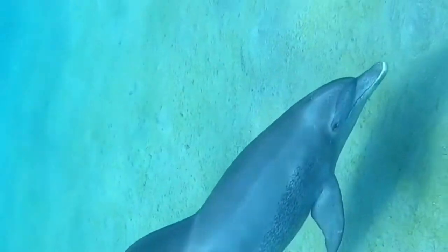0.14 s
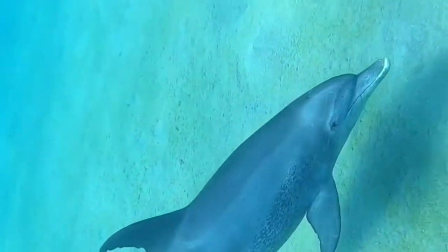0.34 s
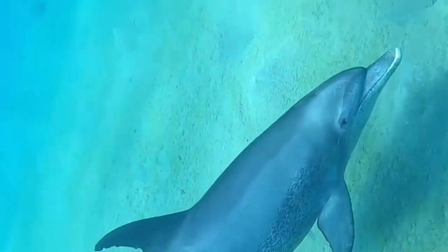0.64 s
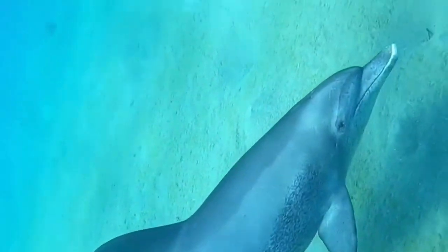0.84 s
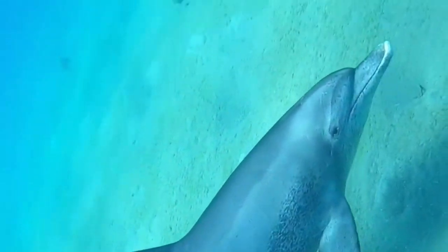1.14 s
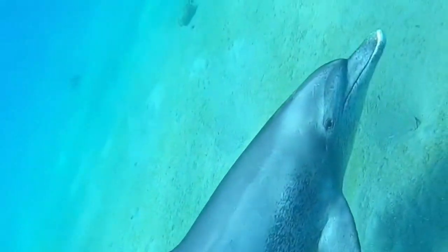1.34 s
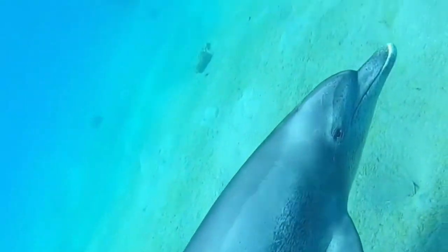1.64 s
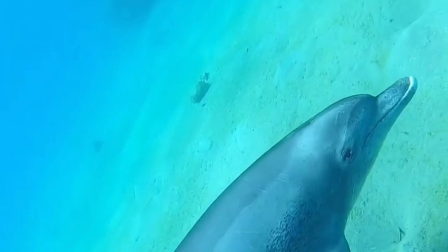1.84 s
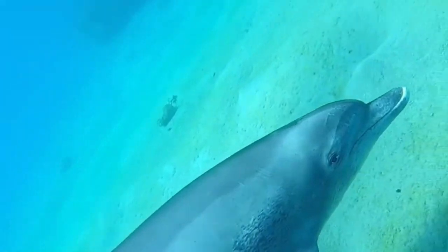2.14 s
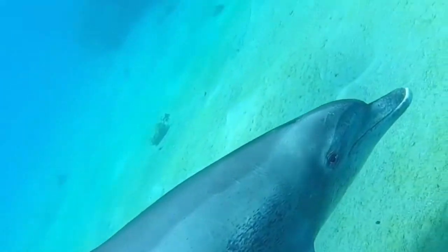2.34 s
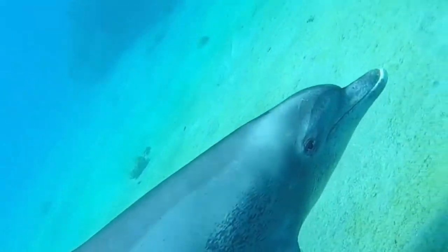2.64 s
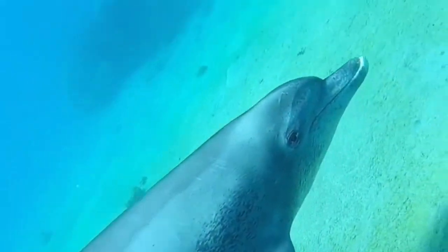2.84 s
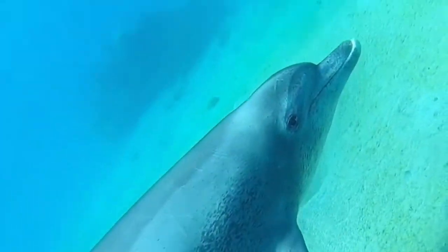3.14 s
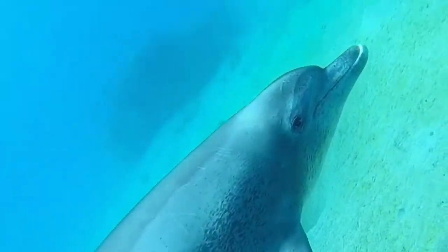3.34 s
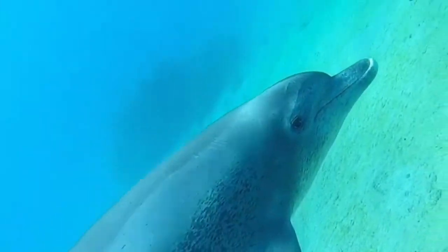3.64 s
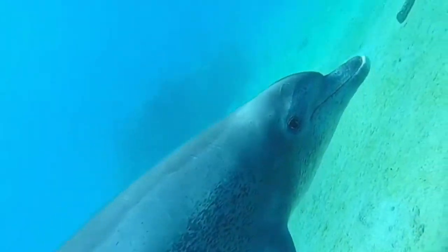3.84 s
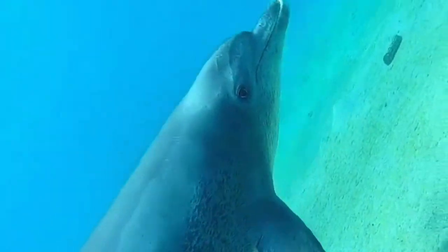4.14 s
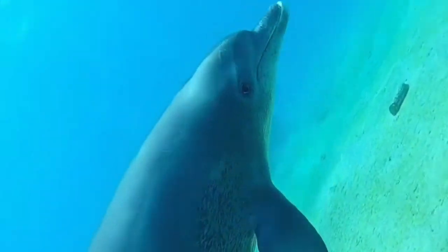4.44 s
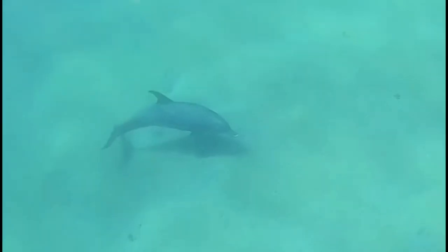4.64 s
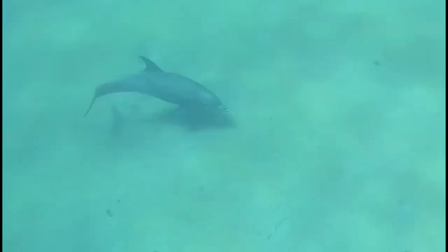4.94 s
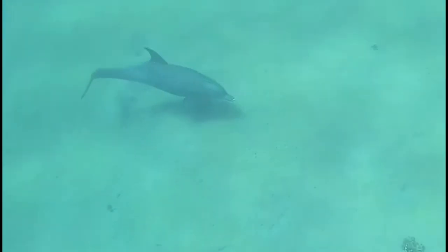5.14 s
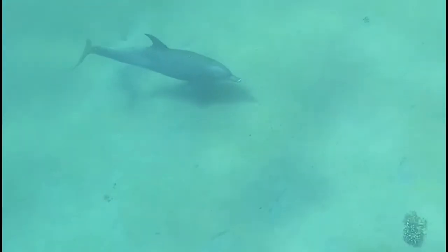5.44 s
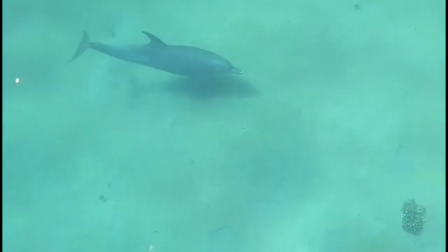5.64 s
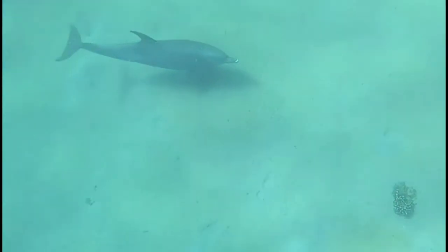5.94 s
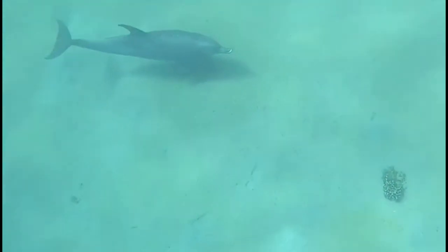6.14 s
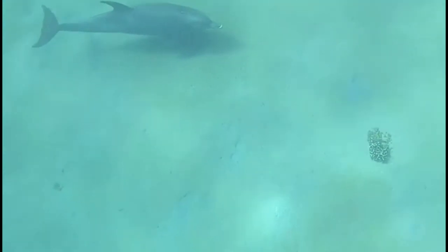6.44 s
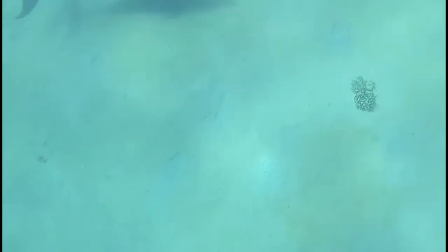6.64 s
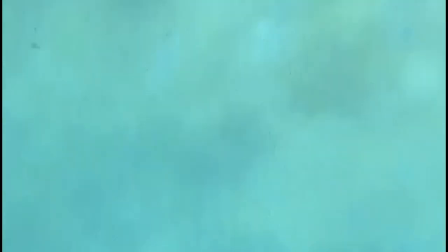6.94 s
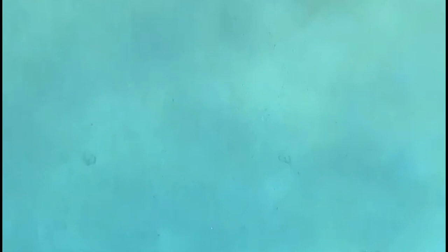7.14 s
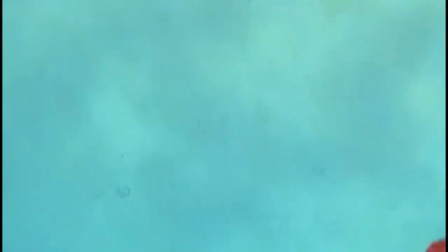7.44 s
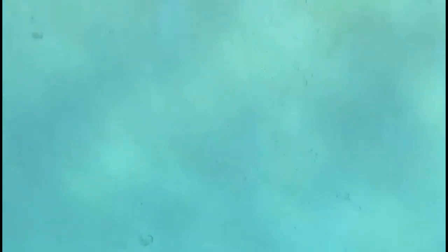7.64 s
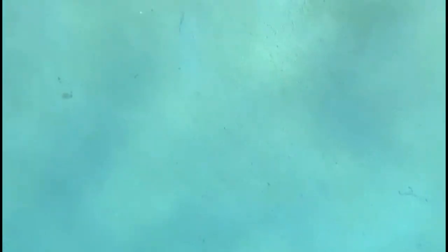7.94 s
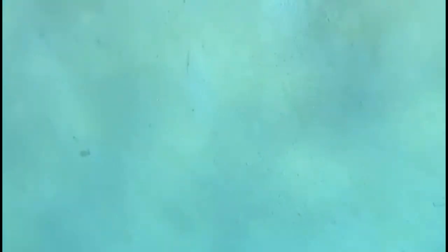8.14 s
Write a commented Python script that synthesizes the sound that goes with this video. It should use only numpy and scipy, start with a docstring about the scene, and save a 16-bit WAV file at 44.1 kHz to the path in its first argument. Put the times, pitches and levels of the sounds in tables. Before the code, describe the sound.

Muffled rumbling water and a distant motor drone, an abrupt change, four echoing upward dolphin whistles, and a sudden bubbly splash that dies away.

```python
"""Under water over a sandy bottom, heard from a sealed housing: noisy, rumbling water, a distant engine's hum, bubbles.
After an abrupt change of place a dolphin's whistle is cut into near its end, then a rising whistle comes four times.
Each whistle is a gliding tone with delayed copies, as if mirrored by the surface and the seabed.
Then churned water, air slaps and gushes of froth, made of filtered noise and falling pulses, rush up and die away."""
import sys
import numpy as np
from scipy import signal
from scipy.fft import rfft, irfft
from scipy.io import wavfile
from scipy.ndimage import uniform_filter1d

SR = 44100
rng = np.random.default_rng(int(sys.argv[2]) if len(sys.argv) > 2 else 0)


def int16_out(signal):
    """Quantize to a 16-bit WAV file."""
    q = np.round(np.clip(np.atleast_2d(signal).T, -1, 1) * 32767)
    wavfile.write(sys.argv[1], SR, q.astype(np.int16))


N = 365588
TIME = np.arange(N) / SR
FREQ = np.maximum(np.arange(N // 2 + 1) * SR / N, 1)
TOP_HZ = 15600  # upper limit of the sound
CUT_S, RESUME_S = 4.597, 4.611  # the first place stops, the second is let in
CHURN_START_S, CHURN_RISE_S = 7.08, 0.064  # when the rush begins and how long it takes to rise


def undb(db):
    """Decibels to gain."""
    return 10 ** (np.asarray(db) / 20)


def curve(table, column=1):
    """One column of a table, joined by straight lines in time."""
    rows = np.asarray(table)
    return np.interp(TIME, rows[:, 0], rows[:, column])


def ramp(start_s, end_s):
    """Rises evenly from 0 to 1 between two times."""
    return np.clip((TIME - start_s) / max(end_s - start_s, 1 / SR), 0, 1)


def gate(start_s, end_s):
    """On between two times, with soft edges."""
    return uniform_filter1d(1. * ((TIME > start_s) & (TIME < end_s)), 200)


def unit(x):
    """Scale to rms 1."""
    return x / np.sqrt(np.mean(x ** 2))


def colour(x, points, resonances=()):
    """Filter by a smooth spectrum with bell-shaped lifts or dips on it."""
    hz, db = np.transpose(points)
    shape = np.interp(np.log(FREQ), np.log(hz), db)
    for centre, width, lift in resonances:
        shape = shape + lift * np.exp(-2 * ((FREQ - centre) / width) ** 2)
    return irfft(rfft(x) * undb(shape), N)


def band(x, low_hz, high_hz):
    """The part of a sound between two frequencies."""
    return irfft(rfft(x) * ((FREQ >= low_hz) & (FREQ < high_hz)), N)


def filtered(x, order, edges_hz, kind="low"):
    """Pass a sound through a filter with gentle edges."""
    return signal.sosfilt(signal.butter(order, edges_hz, kind, fs=SR, output="sos"), x)


def delay(x, ms):
    """Delay by any fraction of a sample."""
    return irfft(rfft(x) * np.exp(-2j * np.pi * FREQ * ms / 1000), N)


def walk(rate):
    """Random wandering of rms 1: chance levels held for 1 / rate seconds and smoothed twice."""
    k = max(int(SR / rate), 1)
    held = np.repeat(rng.standard_normal(N // k + 2), k)
    return unit(uniform_filter1d(uniform_filter1d(held, k), k)[:N])


def crackle(per_s, spread_db):
    """Random tiny clicks, a few much stronger than the rest."""
    sizes = undb(spread_db * np.minimum(rng.exponential(size=N), 5))
    return unit((rng.random(N) < per_s / SR) * sizes * rng.choice([-1, 1], N))


def add(out, start_s, sound):
    """Mix a short sound in at its time."""
    i = int(start_s * SR)
    out[i:i + len(sound)] += sound[:N - i]


# how readily the housing flexes: (f/Hz, level/dB)
FLEX = [(600, -45), (1000, -2), (2500, 0.5), (5000, 3), (7500, -6.5), (12000, -3)]


def ports(x, lag_ms, side_db):
    """Two close microphone ports; from about 1 kHz up the flexing housing shakes them a little differently."""
    flex = undb(side_db) * delay(colour(x, FLEX), .45)
    side = (delay(x, lag_ms / 2) - delay(x, -lag_ms / 2)) / 2 + flex
    return np.array([x + side, x - side])


def water(spectrum, housing, body_db, hiss_db, crackle_db):
    """Sea noise with fine crackle in it, coloured by the housing; low body and high hiss swell apart."""
    noise = rng.standard_normal(N) + undb(crackle_db) * crackle(900, spread_db=2.5)
    coloured = colour(noise, spectrum, housing)
    body = band(coloured, 130, 1100) / np.std(band(coloured, 200, 900))
    hiss = band(coloured, 1100, TOP_HZ) / np.std(band(coloured, 1800, 7000))
    # as the hiss fades it also grows duller
    dulling = undb(hiss_db - hiss_db.max() - 1.5)
    hiss = hiss + (dulling - 1) * band(hiss, 7200, TOP_HZ)
    return body * undb(body_db + .7 * walk(12)) + hiss * undb(hiss_db + .6 * walk(15))


# borders between the fluttering bands: f/Hz
FLUTTER_EDGES_HZ = [1100, 1800, 2350, 2850, 3600, 5000]
FLUTTER_PER_S, FLUTTER_DB = 9, 0.5
# brief swishes of the water: (start t/s, length t/s, lower f/Hz, upper f/Hz, lift level/dB)
SWISHES = [(2.75, 0.058, 2400, 3000, 4.9), (3.38, .06, 2400, 3000, 3), (4.61, 0.044, 600, 1000, 6.9),
           (4.73, 0.11, 850, 1750, 6.7), (4.82, 0.064, 1250, 1750, 5.9), (4.865, 0.031, 850, 1350, 8.7),
           (5.21, .16, 1210, 1800, 2.7), (5.635, 0.024, 700, 1150, 7), (5.895, 0.029, 1500, 4000, 6.4)]


def stir(x):
    """The bands of the water noise flutter on their own, and brief swishes lift some of the sound."""
    for low_hz, high_hz in zip(FLUTTER_EDGES_HZ, FLUTTER_EDGES_HZ[1:]):
        x = x + (undb(FLUTTER_DB * walk(FLUTTER_PER_S)) - 1) * band(x, low_hz, high_hz)
    for start, length, low_hz, high_hz, lift_db in SWISHES:
        two_way = signal.butter(3, [low_hz, high_hz], "band", fs=SR, output="sos")
        swished = signal.sosfiltfilt(two_way, x)
        x = x + (undb(lift_db) - 1) * np.sin(np.pi * ramp(start, start + length)) * swished
    return x


# colour of the rumble at the first place, where the housing drifts gently: (f/Hz, level/dB per Hz)
DRIFT_COLOUR = [(10, -1.5), (22, 3.5), (40, 0), (58, -3), (85, -3), (120, -3.5), (150, -12), (250, -24),
                (500, -56.5), (2000, -130)]
DRIFT_DB = -30.5
# flow pressing on the housing at the second place: (t/s, level/dB)
FLOW = [(4.61, -27), (4.85, -24.5), (6.4, -24), (7.6, -18), (8.29, -35)]
# colour of that flow: (f/Hz, level/dB per Hz)
FLOW_COLOUR = [(12, -10), (25, 3.5), (50, -3), (105, -7.5), (150, -18.5), (250, -30), (500, -58),
               (2000, -130)]
BUFFET_PER_S, BUFFET_DB = 7.7, 1.5  # random buffeting around the flow level


def rumble():
    """Water flowing past presses on the housing: low noise, steady at first, buffeting at the second place."""
    drift = unit(colour(rng.standard_normal(N), DRIFT_COLOUR)) * undb(DRIFT_DB)
    flow_db = curve(FLOW) + BUFFET_DB * walk(BUFFET_PER_S)
    flow = unit(colour(rng.standard_normal(N), FLOW_COLOUR)) * undb(flow_db)
    return np.where(TIME < CUT_S, drift, flow)


# water noise at the first and the second place: (f/Hz, level/dB per Hz)
FIRST_WATER = [(130, -2), (300, -14.5), (470, -5), (750, -17), (1000, -27.5), (1400, -28.5), (2000, -40),
               (2900, -38), (4000, -49.5), (6700, -59), (8300, -67.5), (11000, -54), (13300, -62.5),
               (15000, -72)]
SECOND_WATER = [(130, -1.5), (220, -8.5), (430, -4.5), (650, -13), (850, -19), (1300, -32), (2000, -33),
                (3000, -37.5), (4300, -38), (5700, -45.5), (8000, -58.5), (12000, -63), (15000, -73)]
# resonances of the housing at each place: (f/Hz, width f/Hz, lift level/dB)
FIRST_HOUSING = [(295, 215, 3.5), (475, 60, 4.5), (704, 98, 4.5), (1032, 138, -5), (1484, 30, 5),
                 (1850, 160, 1), (2350, 100, -9.5), (2515, 273, 8), (3040, 210, 5.5), (4496, 240, 9.5)]
SECOND_HOUSING = [(431, 48, 6), (591, 40, 5.5), (848, 57, -8), (937, 11, 4.5), (1122, 24, 8),
                  (1200, 180, -3.5), (1568, 140, 9.5), (2036, 48, 6), (2350, 110, 4.5), (3430, 130, 5.5),
                  (3650, 100, -4), (4480, 310, 2.5), (5130, 310, -6)]
# surges of water along the housing: (peak t/s, rise t/s, fall t/s, lift level/dB)
SURGES = [(3.57, 0.084, 0.16, 5), (5.27, 0.096, 0.65, 5.5), (6.7, 0.36, 0.48, 5)]
# first place: starting levels; the noise slowly calms and swells gently at random
FIRST_BODY_DB, FIRST_HISS_DB, CALM_DB_PER_S = -32, -55, 0.8
SWELL_PER_S, SWELL_DB = 2.57, 0.5
# second place: starting levels; body and hiss drop from their fade times until the quiet time
SECOND_BODY_DB, SECOND_HISS_DB = -32.5, -52.5
BODY_FADE_S, HISS_FADE_S, QUIET_S = 7.5, 6.94, 7.82
BODY_DROP_DB, HISS_DROP_DB = 10, 13
WATER_WIDTH_DB = -5.5  # how much the water noise flexes the housing


def sea():
    """The water noise at both places, lifted by surges, over the low rumble of the flow."""
    surge = 0
    for peak, rise, fall, lift_db in SURGES:
        surge = surge + lift_db * (ramp(peak - rise, peak) - ramp(peak, peak + fall))
    calm = CALM_DB_PER_S * TIME + SWELL_DB * walk(SWELL_PER_S)
    first = water(FIRST_WATER, FIRST_HOUSING, FIRST_BODY_DB - calm + surge, FIRST_HISS_DB - calm,
                  crackle_db=-11.0)
    body_db = SECOND_BODY_DB + surge - BODY_DROP_DB * ramp(BODY_FADE_S, QUIET_S)
    hiss_db = SECOND_HISS_DB - HISS_DROP_DB * ramp(HISS_FADE_S, QUIET_S)
    second = water(SECOND_WATER, SECOND_HOUSING, body_db, hiss_db, crackle_db=-7.5)
    stirred = stir(np.where(TIME < CUT_S, first, second))
    return ports(stirred, lag_ms=.045, side_db=WATER_WIDTH_DB) + rumble()


# hum of a distant engine: (t/s, level/dB)
HUM_LEVEL = [(0, -34.5), (1.3, -34), (1.8, -29.5), (2.6, -38), (3.0, -29.5), (3.5, -26), (3.75, -33),
             (4.6, -42), (8.29, -38)]
HUM_HZ, HUM_WAVER_HZ = 72.14, .3  # the engine's clean line
DRONE_HZ, DRONE_WIDTH_HZ, DRONE_DB = 98.8, 7, -35.5  # a rougher drone above it


def engine():
    """A distant engine: a slightly wavering hum and, at the first place, a narrow rough drone above it."""
    hum_hz = HUM_HZ + HUM_WAVER_HZ * walk(4)
    hum = np.sin(2 * np.pi * np.cumsum(hum_hz) / SR) * undb(curve(HUM_LEVEL))
    phase = 2 * np.pi * DRONE_HZ * TIME
    # two randomly wandering strengths spread the drone's pitch into a narrow band
    drone = walk(2 * DRONE_WIDTH_HZ) * np.sin(phase) + walk(2 * DRONE_WIDTH_HZ) * np.cos(phase)
    return hum + undb(DRONE_DB) * unit(drone) * (TIME < CUT_S)


# single bubbles: (t/s, starting f/Hz, ring level/dB, ringing time t/s, glide in octaves)
BUBBLES = [(2.296, 149, -11.5, 0.058, -0.46), (2.44, 3800, -65, 0.22, 0), (2.758, 3760, -46, 0.013, -.1),
           (2.82, 5000, -63, 0.022, 0), (2.872, 1386, -38, 0.12, 0.26), (3.05, 2820, -51, 0.049, -0.11),
           (3.385, 674, -33, 0.29, -0.57), (3.437, 5600, -59, .009, 0), (3.497, 1445, -37, 0.12, 0.025),
           (3.511, 197, -11, 0.036, -0.58), (3.515, 1517, -27.5, 0.034, -0.097),
           (3.529, 266, -26.5, 0.15, -0.57), (3.565, 540, -19.5, 0.023, -0.84),
           (3.572, 102, -12, 0.031, 0.27), (3.612, 312, -27, .06, 0), (3.6426, 600, -18.5, 0.03, 0.19),
           (3.646, 311, -21, 0.073, 0.07), (3.653, 1400, -43, 0.085, -.1),
           (3.666, 3220, -39.5, 0.024, -0.2), (3.726, 125, -18.5, 0.099, 0.77),
           (3.801, 1470, -43, 0.11, -0.26), (3.815, 5400, -56, 0.01, -.2), (4.038, 1430, -45, .06, -0.0099),
           (4.195, 2090, -49, .02, 0), (4.316, 131, -20, 0.069, 0.24), (4.364, 5350, -53, 0.011, -.2),
           (5.24, 1680, -46, 0.17, 0.26), (5.552, 1560, -50.5, 0.053, -0.071),
           (5.258, 122.5, -22, 0.35, -0.78), (6.16, 151, -17, 0.084, -0.55),
           (6.438, 170, -19, 0.072, -0.22), (7.273, 3150, -31, .014, -0.25),
           (7.312, 150, -8.5, 0.037, 0.071), (7.357, 3100, -36, .014, -0.3), (7.391, 695, -14, 0.015, -1.1),
           (7.395, 1040, -21.5, 0.013, -1.2), (7.458, 3300, -51, 0.023, -0.5),
           (7.518, 935, -18, 0.05, -0.042), (7.531, 1590, -38, 0.029, 2), (7.589, 1250, -30, .016, -0.29),
           (7.614, 415, -20, 0.079, -0.072), (7.658, 1210, -28, 0.049, 0.84),
           (7.72, 161.4, -18.5, 0.13, -0.038), (7.797, 1560, -45.5, 0.062, -0.23)]
PINCH_DB = 3  # click of a tiny bubble, re its ring


def bubbles():
    """Each bubble rings at the pitch of its size, wobbles and glides; before the rush tiny ones also click."""
    out = np.zeros(N)
    for start, hz, db, t60, glide in BUBBLES + shower():
        t = TIME[:int(t60 * SR)]
        phase = 2 * np.pi * np.cumsum(hz * 2 ** (glide * t / t60)) / SR
        swell = (1 - np.exp(-t / (.05 * t60))) ** 2
        ring = swell * np.exp(-np.log(1000) * t / t60) * (1 - t / t60)
        wobble = filtered(rng.standard_normal(len(t)), 3, [.75 * hz, 1.3 * hz], "band")
        sound = ring / ring.max() * (np.sin(phase) + .16 * unit(wobble))
        if hz > 2500 and start < CHURN_START_S:
            click = np.exp(-t * hz / 1.5) * np.cos(phase) * (1 - np.exp(-t * hz * 8))
            sound = sound + undb(PINCH_DB) * click
        add(out, start, undb(db) * sound)
    return ports(out, lag_ms=0.05, side_db=-12)


# one curve per whistle, the first already under way: (t/s, f/Hz, level/dB before the common gain)
WHISTLES = [
    [(4.61, 8600, -81), (4.618, 8718, -58), (4.624, 8700, -80), (4.676, 9700, -61), (4.684, 9800, -77),
     (4.69, 9785, -84)],
    [(4.917, 4040, -48.5), (4.965, 4590, -48), (4.995, 5020, -50.5), (5.033, 5140, -55), (5.048, 5185, -41),
     (5.092, 5310, -39.5), (5.134, 5600, -40), (5.147, 5770, -52), (5.172, 6100, -40), (5.205, 6720, -50),
     (5.233, 7300, -66), (5.265, 7800, -55), (5.285, 8000, -74), (5.411, 9940, -68), (5.44, 10276, -82)],
    [(5.626, 4010, -48), (5.646, 4410, -35.5), (5.66, 4630, -40), (5.712, 4940, -41), (5.73, 5160, -53),
     (5.798, 5290, -46), (5.835, 5610, -47), (5.87, 6000, -42), (5.882, 6180, -36.5), (5.904, 6600, -48),
     (5.948, 7400, -57.5), (5.998, 8024, -66), (6.072, 8680, -61), (6.078, 8900, -74), (6.168, 10119, -64)],
    [(6.359, 3790, -43), (6.371, 4290, -34), (6.417, 4820, -43), (6.445, 4920, -59), (6.461, 5050, -44),
     (6.487, 5190, -58), (6.513, 5215, -36.5), (6.571, 5535, -36), (6.627, 6180, -52), (6.655, 6795, -43.5),
     (6.683, 7200, -64), (6.723, 7720, -49.5), (6.743, 8018, -71), (6.801, 8530, -59), (6.91, 10200, -81)],
    [(7.105, 3760, -41), (7.121, 4280, -43), (7.147, 4504, -48), (7.157, 4620, -44), (7.189, 4823, -57.5),
     (7.211, 4970, -51), (7.309, 5440, -51.5), (7.335, 5800, -70), (7.381, 6300, -59), (7.415, 6930, -71),
     (7.435, 7170, -61), (7.475, 7930, -77), (7.489, 8007, -88), (7.581, 8930, -75), (7.665, 10255, -85)],
]
# sound paths of a whistle besides the direct one: (extra delay/ms, level/dB)
PATHS = [(3.7, -12.5), (7.9, -14.5), (14.5, -14.5)]
WHISTLE_DB = 5  # common gain of the main tones
# a faint added tone a fixed 6750 Hz above the whistle: start level re the whistle's peak before the common gain
ADDED_GAP_HZ, ADDED_DB, ADDED_FADE_DB_PER_S = 6750, -44.5, 12
ADDED_DROP_DB = 14  # the added tone is set this much lower once the churn begins
ADDED_FOLLOW = .4  # share of the whistle's level changes applied to the added tone
# a short patch of rough high noise is added after each whistle before the rush
PATCH_LEAD_S, PATCH_S, PATCH_RISE_HZ, PATCH_DB = .005, .048, 2400, -68


def dolphin():
    """A nearly pure rising tone that thins out near 10 kHz; delayed copies beat against it as it sweeps."""
    tone = np.zeros(N)
    waver = 1 + .001 * walk(90)
    roughness, uneven_db = walk(2800), 4 * walk(45)
    drop_db = ADDED_DROP_DB * ramp(CHURN_START_S, CHURN_START_S + CHURN_RISE_S)
    for whistle in WHISTLES:
        start, end = whistle[0][0], whistle[-1][0]
        peak_db = max(row[2] for row in whistle)
        level_db = curve(whistle, 2)
        after = ramp(end, end + PATCH_S)
        hz = uniform_filter1d(curve(whistle) + PATCH_RISE_HZ * after, size=700) * waver
        phase = 2 * np.pi * np.cumsum(hz) / SR
        voice = np.sin(phase) + undb(-43) * np.sin(2 * phase) * (hz < 5000)
        fade_db = ADDED_FADE_DB_PER_S * np.maximum(TIME - start, 0)
        added_db = peak_db + ADDED_DB - drop_db - fade_db + uneven_db
        added_db = added_db + ADDED_FOLLOW * (level_db - peak_db)
        added = undb(added_db) * np.sin(phase + 2 * np.pi * ADDED_GAP_HZ * TIME)
        tone += gate(start, end) * (undb(level_db + WHISTLE_DB) * voice + added)
        if end < CHURN_START_S:
            patch = undb(PATCH_DB) * roughness * np.sin(phase)
            tone += gate(end - PATCH_LEAD_S, end + PATCH_S) * np.sqrt(1 - after) * patch
        # the first whistle, already under way, gets no squeak
        if start > RESUME_S + PATCH_S:
            add(tone, start - .026, squeak())
    tone = tone * undb(walk(120)) * (TIME > CUT_S)
    mirrored = sum(undb(db) * delay(tone, ms) for ms, db in PATHS)
    # the rippled surface and the sand scatter a short diffuse tail
    t = TIME[:SR // 3]
    tail = rng.standard_normal(len(t)) * undb(-60 * t / 0.12)
    scattered = signal.fftconvolve(tone, tail / np.sqrt(np.sum(tail ** 2)))[:N]
    return ports(tone + mirrored + undb(-12) * scattered, lag_ms=.085, side_db=-14)


def squeak(length=.026, low_hz=2600, high_hz=3600):
    """The faint buzzy upsweep of three partials just before a whistle's tone locks in."""
    u = np.linspace(0, 1, int(length * SR))
    phase = 2 * np.pi * np.cumsum(low_hz + (high_hz - low_hz) * np.sin(np.pi * u / 2)) / SR
    partials = undb(-52.5) * np.sin(phase) + undb(-58.5) * np.sin(2 * phase) + undb(-75) * np.sin(3 * phase)
    flutter = undb(3 * walk(250)[:len(u)])
    return partials * flutter * np.sqrt(4 * u * (1 - u))


# colour of the froth, in the churn and in the gushes: (f/Hz, level/dB per Hz)
FROTH = [(60, 1.5), (150, 12.5), (260, 2), (450, 6.5), (950, -9), (1500, -13.5), (2150, -33.5),
         (3100, -24.5), (4200, -37), (5200, -35.5), (7000, -38.5), (9000, -52), (12000, -66),
         (15000, -86.5)]
CHURN_END_S, CHURN_DB, CHURN_FADE_DB_PER_S = 7.62, -33, 59.5  # level before the upper part is softened


def churn():
    """Churned water, a dense crackle of bursting grains: it rises, holds, then dies away."""
    froth = unit(colour(crackle(6500, spread_db=2.0), FROTH))
    softened = froth - 0.24 * band(froth, 800, TOP_HZ)
    level_db = CHURN_DB - CHURN_FADE_DB_PER_S * np.maximum(TIME - CHURN_END_S, 0)
    out = softened * undb(level_db) * ramp(CHURN_START_S, CHURN_START_S + CHURN_RISE_S)
    return ports(out, lag_ms=0.082, side_db=-26.0)


# air pockets slapping the housing: (t/s, pulse level/dB, base f/Hz that the falling pitch is scaled from,
# fall time/ms, crack level/dB re the pulse, housing ring level/dB)
SLAPS = [(7.187, -14, 912, 2.6, -21, -9.5), (7.217, -13, 1570, 2.4, -10, -19),
         (7.2667, -9.5, 1080, 2.8, -15.5, -15), (7.309, -9.5, 1866, 1.6, -7, -4.5),
         (7.346, -13.5, 1507, 2.4, -8, -10), (7.3885, -17, 1166, 4, -16, -12.5),
         (7.473, -3.5, 307, 5.2, -23, -10.5), (7.57, -33, 2800, 1.2, -4.5, -17.5),
         (7.582, -21.5, 1300, 3.4, -14.5, -11.5), (7.593, -5, 115, 11, -15, -29),
         (7.651, -12, 200, 7, -18.5, -30), (7.752, -21, 300, 6, -9, -21)]
SLAP_RING_HZ, SLAP_RING_T60_S = 457, 0.028


def slaps():
    """An air pocket flattens on the housing: a crack, a short pulse whose pitch drops, a hollow ring."""
    out, t = np.zeros(N), TIME[:SR // 3]
    ring = np.sin(2 * np.pi * SLAP_RING_HZ * t) * np.exp(-np.log(1000) * t / SLAP_RING_T60_S)
    ring = ring * (1 - np.exp(-t / .0006))
    for start, db, hz, fall_ms, crack_db, ring_db in SLAPS:
        age = t / (fall_ms / 1000)
        phase = 2 * np.pi * np.cumsum(hz * (0.139 + 0.735 * np.exp(-age))) / SR
        push = (1 - np.exp(-age / .4)) * np.exp(-age / 1.7)
        pulse = push / push.max() * np.sin(phase)
        # the higher the pocket's pitch, the brighter its crack
        crack = unit(filtered(rng.standard_normal(len(age)), 4, min(1.7 * hz, TOP_HZ)))
        crack = crack * (1 - np.exp(-age / .1)) * np.exp(-age / .8)
        add(out, start, undb(db) * (pulse + undb(crack_db) * crack) + undb(ring_db) * ring)
    return ports(out, lag_ms=0.087, side_db=-19.5)


# gushes of froth: (t/s, length t/s, level/dB before the lifts, body lift level/dB, treble lift level/dB,
# swell level/dB from start to end, upper edge f/Hz)
GUSHES = [(7.189, 0.034, -12, -9.5, -2.5, 4, 7600), (7.23, 0.015, -26.5, -10.5, 4.5, -1, 4050),
          (7.249, 0.02, -19, -4, -1.5, 1.5, 5000), (7.27, 0.048, -20, -2, 2, 0, 7500),
          (7.332, 0.02, -22, -12.5, 6, 4, 3600), (7.36, .065, -30.5, -9, 2.5, -0.5, 3500),
          (7.385, 0.02, -25, 3.5, -6.5, -5, 3000), (7.469, 0.045, -28, -1, -7, -0.5, 5010),
          (7.518, 0.018, -20.5, -2.5, 2.5, -2.5, 3300), (7.567, .028, -23, -1.5, 9, 2, 6500),
          (7.598, .022, -28.5, 3, 4.5, 0.5, 9000), (7.623, 0.022, -25, 2.5, -13, -1, 2000),
          (7.709, 0.048, -31.5, 0, -2, -3, 7000), (7.792, 0.0042, -33, 1, 5.5, -0.5, 8900)]
# resonances that the froth rings in the housing: (f/Hz, width f/Hz, lift level/dB)
FROTH_RINGS = [(794, 49, -7), (1570, 89, 1), (3040, 560, 2.5), (4940, 420, 8.5), (5800, 580, -17)]


def gushes():
    """Bursts of froth made of countless bursting grains; some swell as they go, others sink."""
    froth = unit(colour(crackle(3200, spread_db=3.5), FROTH, FROTH_RINGS))
    body, fizz = band(froth, 0, 900), band(froth, 1900, TOP_HZ)
    out = np.zeros(N)
    for start, length, db, body_db, lift_db, swell_db, edge_hz in GUSHES:
        level_db = db + swell_db * (ramp(start, start + length) - 1.0)
        gush = froth + (undb(body_db) - 1) * body + (undb(lift_db) - 1) * fizz
        gush = filtered(gush, 4, min(edge_hz, TOP_HZ))
        out += gate(start, start + length) * undb(level_db) * gush
    return ports(out, lag_ms=0.082, side_db=-26.0)


SHOWER_LOW_HZ, SHOWER_HIGH_HZ = 896, 3660
SHOWER_DB, SHOWER_CYCLES = -10, 25  # level re the gush at the lowest pitch; cycles each bubble rings


def shower(count=5):
    """Rows of small bubbles scattered through each gush; the smaller they are, the higher, weaker and briefer."""
    rows = []
    for start, length, db, _, lift_db, *_ in GUSHES:
        for when, small in rng.random((count, 2)):
            hz = SHOWER_LOW_HZ * (SHOWER_HIGH_HZ / SHOWER_LOW_HZ) ** small
            # a gush with dull treble also has weaker small bubbles
            peak_db = db + SHOWER_DB + small * min(lift_db, 0) - 20 * np.log10(hz / SHOWER_LOW_HZ)
            rows.append((start + when * length, hz, peak_db, SHOWER_CYCLES / hz, .3))
    return rows


# how much stronger the treble of a centred sound is on the right than on the left: (t/s, level/dB)
TREBLE_LEAN = [(6.95, 3), (7.12, 8), (7.35, 0), (7.55, 2.5), (7.75, 6), (8.29, 15.5)]


def scene():
    """Everything that reaches the housing; the treble leans to the right by a changing amount."""
    sound = sea() + engine() + bubbles() + dolphin() + churn() + slaps() + gushes()
    ratio = undb(curve(TREBLE_LEAN))
    lean = (ratio - 1) / (ratio + 1) * band(sound, 4000, TOP_HZ)
    return sound + np.array([[-1], [1]]) * lean


# the sound is all but mono at first and opens out late: (t/s, level/dB of the side sound)
WIDTH = [(6.1, -50), (6.2, -29), (6.4, -16), (6.6, -11.5), (7, -7), (7.17, -3.5)]


def record(dry):
    """Nearly mono, opening out late; silent for an instant at the change of place; the top is cut."""
    mid = dry.mean(axis=0)
    opened = mid + (dry - mid) * undb(curve(WIDTH))
    running = gate(.003, CUT_S - .002) + gate(RESUME_S, TIME[-1] - .003)
    return signal.sosfilt(signal.ellip(8, .2, 70, TOP_HZ, fs=SR, output="sos"), opened * running)


dry = scene()
out = record(dry)
int16_out(out)
```